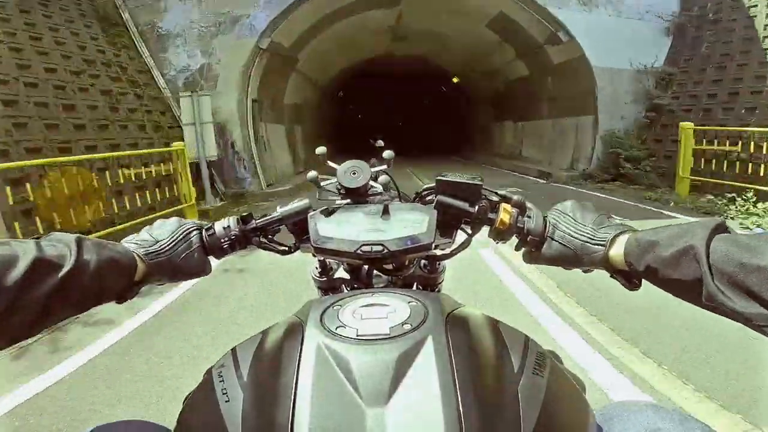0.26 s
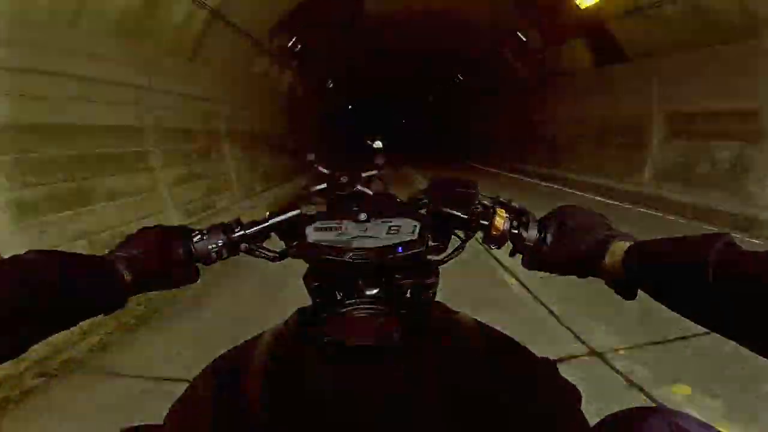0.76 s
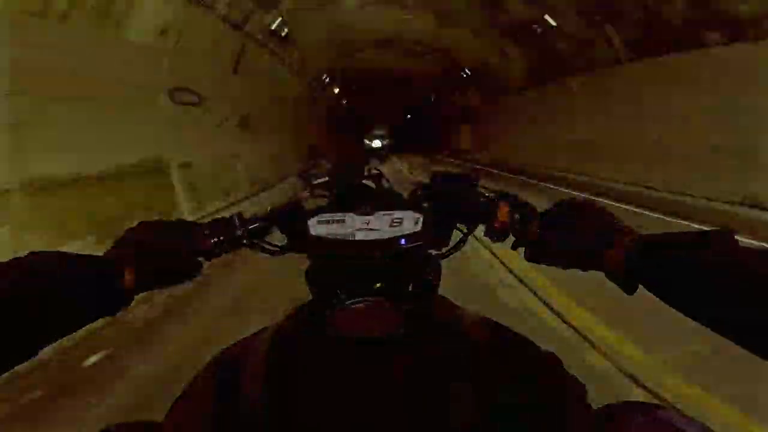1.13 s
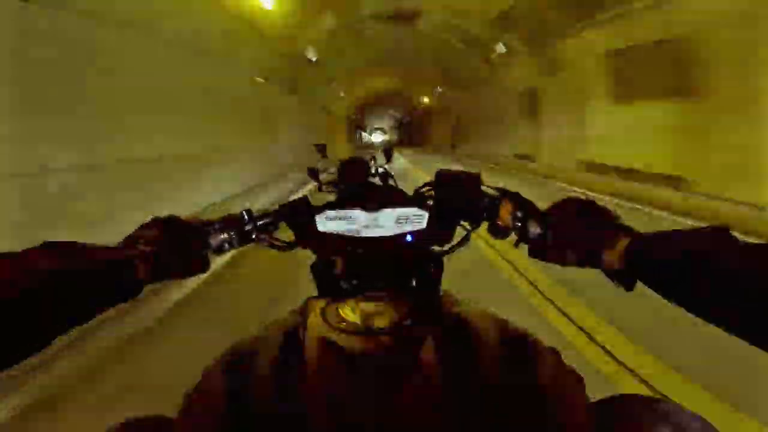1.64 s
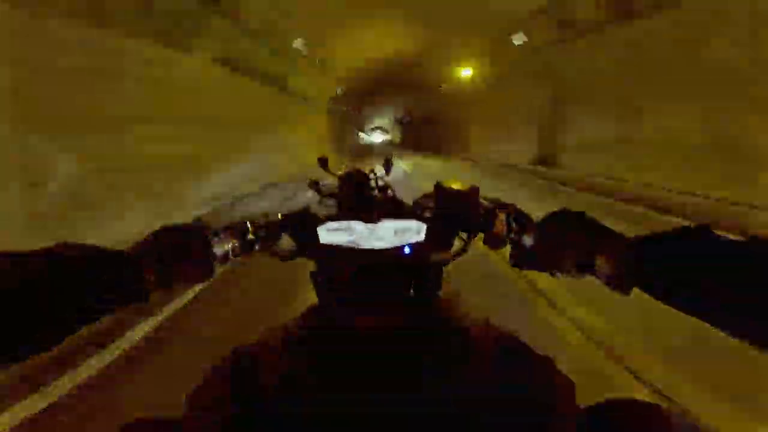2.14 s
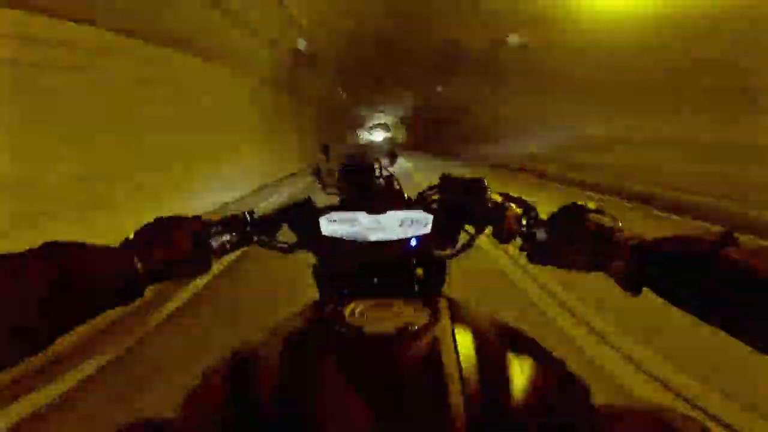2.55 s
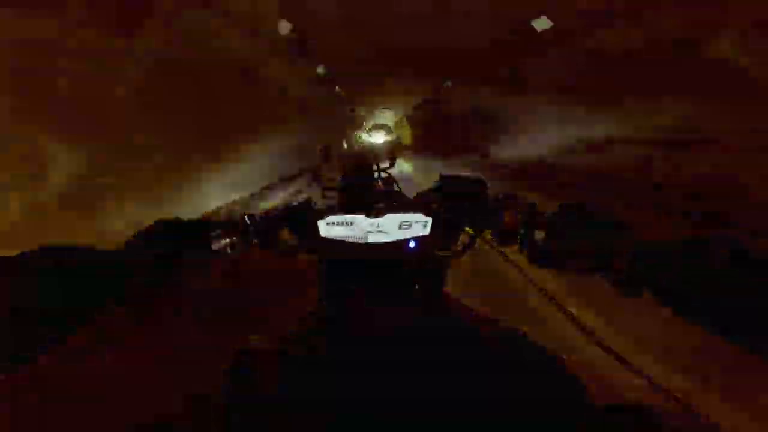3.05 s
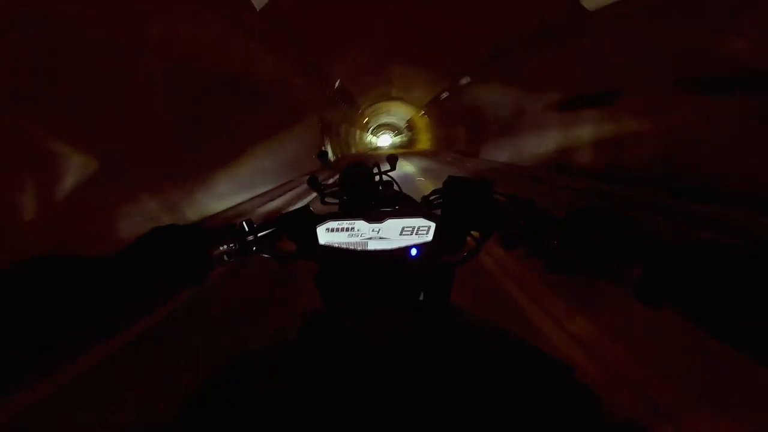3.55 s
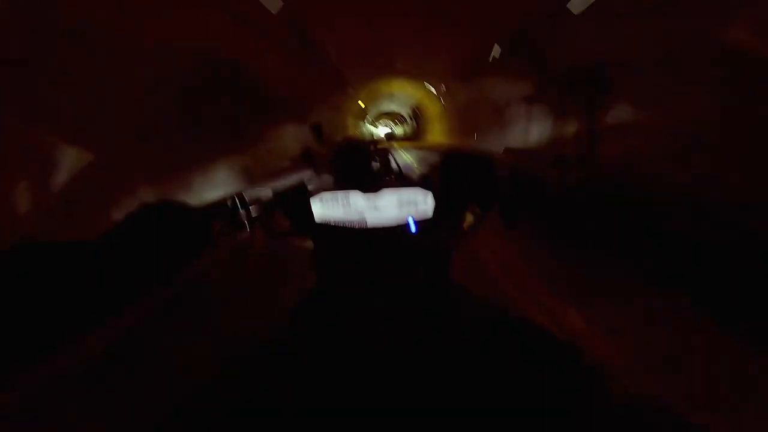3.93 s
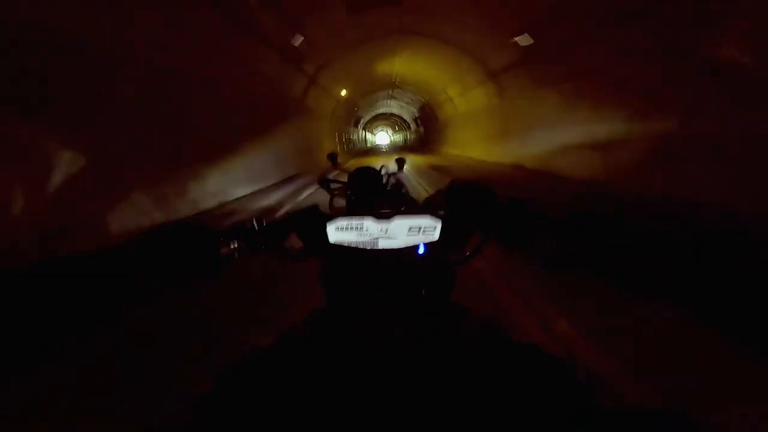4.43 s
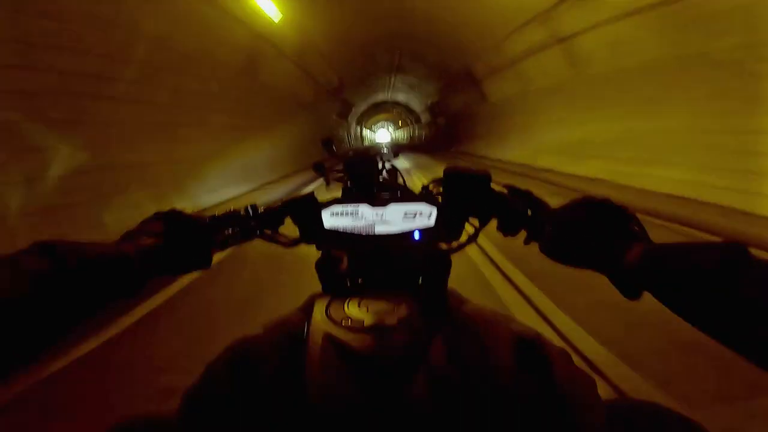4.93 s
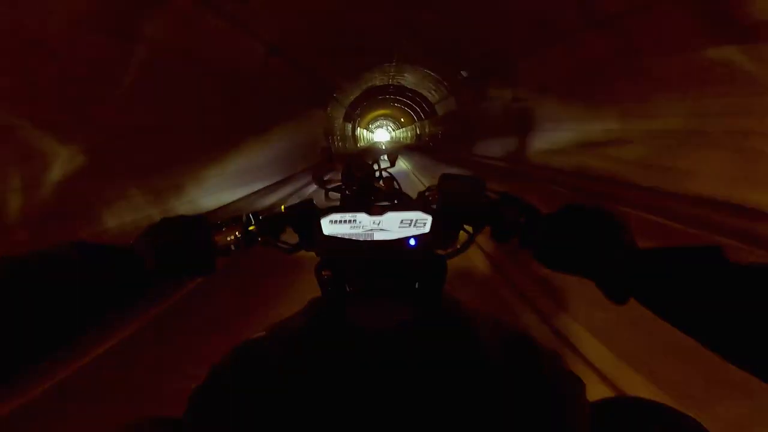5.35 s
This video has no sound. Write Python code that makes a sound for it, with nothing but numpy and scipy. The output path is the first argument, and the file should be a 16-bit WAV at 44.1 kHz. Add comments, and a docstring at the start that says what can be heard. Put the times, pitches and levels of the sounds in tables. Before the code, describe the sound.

A twin-cylinder motorcycle drones very close, heard from the rider's chest. It starts steady on a light throttle as it enters a concrete tunnel, then climbs smoothly in pitch without a gear change. The throttle opens in the second half, making it louder, rougher and raspier. Faint valve ticking and chain whirr sit on top, while smeared wall roar surrounds it and wind thumps the microphone.

```python
"""A twin-cylinder engine drones up close, rising as the motorcycle pulls faster into a road tunnel.
The microphone rides on the rider's chest. Two uneven firings a cycle sound through pipe and airbox as
a stack of gliding orders, and torn gas rasps harder as the throttle opens. Close by, valve gear whirrs
and ticks as gated noise, and the chain whines as wavering tones. Around them the tunnel walls return
a swirling echo and a smeared roar, and wind rumbles and buffets right on the microphone."""
import sys
import numpy as np
from scipy import signal
from scipy.fft import rfft, irfft, next_fast_len
from scipy.io import wavfile
from scipy.ndimage import map_coordinates

SR = 44100
rng = np.random.default_rng(int(sys.argv[2]) if len(sys.argv) > 2 else 0)


def digitize_waveform(pressure):
    """Quantize a signal to 16-bit integers and store it at the path in sys.argv[1].

    Rows of a 2-D input are taken as channels; values are limited to [-1, 1].
    """
    field = np.atleast_2d(pressure).T
    bounded = np.clip(field, -1, 1)
    quanta = np.round(bounded * 32767).astype(np.int16)
    wavfile.write(sys.argv[1], SR, quanta)


N = 246519

# Engine speed; a cycle is two crank turns and two firings. Each row: time in s, cycles a second.
SPEED = [(0.0, 36), (0.25, 36.22), (0.55, 36.33), (0.75, 36.42), (0.95, 36.77), (1.15, 37.08),
         (1.45, 37.44), (1.7, 37.95), (1.95, 38.42), (2.35, 38.9), (2.8, 39.57), (3.2, 40.19),
         (3.45, 40.65), (3.7, 41.0), (3.95, 41.72), (4.2, 42.25), (4.5, 42.7), (4.75, 43.06), (4.95, 43.68),
         (5.15, 44.52), (5.35, 44.94), (5.59, 45.75)]
# Throttle opening. Each row: time in s, opening from 0 (light cruise) to 1 (wide open).
THROTTLE = [(0, 0.0082), (.6, 0.056), (1.4, 0.22), (2.4, 0.2), (3.1, 0.27), (3.9, 0.62), (4.6, 0.66),
            (5.1, 0.97), (5.59, 1)]
# Resonances of pipe and airbox. Each row: centre in Hz, width in Hz, level in dB at a light cruise,
# gain in dB added at full throttle.
PIPE_MODES = [(75.6, 27, -35.5, 1.5), (90.4, 12.3, -35, 7.5), (113.2, 6.9, -47, 10.5),
              (142.9, 18.3, -25, -3), (164, 22, -37, 21.5), (197.6, 17, -42.5, 10.5),
              (229.7, 29.7, -36.5, -1.5), (271.3, 24, -46.5, 10), (313.8, 32.4, -48, 16.5),
              (380.8, 62, -43.5, 18), (419.5, 36.5, -31, -0.5), (444, 24.3, -36, 6),
              (469.8, 20.8, -43.5, 23), (467, 8.3, -37, -13.5), (509, 9.6, -45, -16), (533, 70, -54.5, 15),
              (630.4, 42, -48.5, 8.5), (663, 34, -40.5, -0.5), (775, 68, -58.5, 9), (838, 115, -49.5, 13.5),
              (902, 45, -54.5, 15), (1029, 100, -52.5, 13), (1116, 200, -63, 20)]
# Passing walls reinforce or cancel the airbox boom. Each row: time in s, half length in s, change in dB.
SWELLS = [(.1, 0.12, -2.5), (0.593, 0.17, 2), (0.824, 0.012, -4.5), (1.445, .07, 5.5), (1.86, 0.059, -0.5),
          (2.204, 0.067, -1.5), (2.542, 0.14, 4.5), (3.1, .3, 3.5), (3.753, 0.29, 7), (4.27, 0.031, -6),
          (5.072, 0.053, -9), (5.4, .2, 4.5)]
# Colour of the rasp at a light cruise. Each row: frequency in Hz, relative level in dB per Hz.
RASP_CRUISE = [(350, -20), (620, -2), (750, -6.5), (850, -9.5), (950, 0.5), (1080, -0.5), (1280, -7.5),
               (1530, -8.5), (1730, -12.5), (1860, -11.5), (2100, -16), (2700, -21.5), (4000, -38),
               (16000, -89.5)]
# Colour of the rasp with the throttle wide open. Each row: frequency in Hz, relative level in dB per Hz.
RASP_OPEN = [(350, -18), (620, 1.5), (740, -4.5), (850, 0.5), (1100, 4.5), (1300, -2.5), (1600, -7.5),
             (1860, -4.5), (2100, -12), (2700, -17), (4000, -33.5), (16000, -78)]
# The chain's whine. Each row: multiple of the tooth rate, level in dB with the chain taut.
WHINE = [(3, -60), (4, -67)]
# Colour of the machinery's hiss. Each row: frequency in Hz, relative level in dB per Hz.
WHIRR = [(1500, -16), (2350, -6), (3100, -2), (3700, -2.5), (4300, -8.5), (5300, -9.5), (6100, -12.5),
         (6700, -18.5), (7400, -15), (8700, -19), (10800, -20), (11400, -22), (13100, -26), (14100, -22.5),
         (15600, -43)]
# Ringing engine metal. Each row: frequency in Hz, width in Hz, relative level in dB.
METAL = [(3843, 110, 5), (4870, 330, 0.5), (8130, 180, -9), (8240, 220, -7.5), (9100, 170, -6.5),
         (9790, 270, -4), (10500, 310, -9)]
# Ring of the tunnel. Each row: frequency in Hz, time to die by 60 dB in s.
TUNNEL_T60 = [(100, 3.2), (500, 1.3), (2000, 1.5), (10000, 0.42)]
# Colour of the tunnel roar. Each row: frequency in Hz, relative level in dB per Hz.
ROAR = [(70, -13.5), (120, -5), (190, -1), (250, -0.5), (320, -4.5), (380, -3), (430, 1), (480, -2.5),
        (540, -3), (650, -1.5), (750, -8), (900, -10), (1500, -15.5), (5000, -100)]
# Colour of the wind. Each row: frequency in Hz, relative level in dB per Hz.
WIND = [(15, -15), (28, -3.5), (45, 0.5), (70, -2), (110, -11), (250, -7.5), (800, -60.5), (3000, -110)]
# Buffets of wind on the microphone. Each row: start in s, peak in dB before GUST_DB is added.
GUSTS = [(.72, -43), (1.39, -44.5), (2.52, -36), (2.59, -36.5), (3.174, -46), (3.454, -29.5), (3.79, -38),
         (3.91, -40.5), (4.5, -38), (5.11, -41.5), (5.42, -34)]
# Likeness of the two microphone ports. Each row: frequency in Hz, left-right likeness.
ALIKE = [(40, 0.19), (300, 0.84), (600, 0.57), (1200, 0.59), (2200, 0.3), (4000, 0.65), (8000, 0.95),
         (13000, 0.58)]
# Colour difference of the two ports. Each row: frequency in Hz, left minus right in dB.
LEAN = [(80, -2.5), (130, 1), (400, -0.9), (650, -3.5), (1200, -1.1), (2300, -0.5), (4400, 0), (9000, -0.3)]

# shares of a cycle: start to first firing, first firing to second, intake rush ahead of exhaust puff
FIRST_FIRING, SECOND_FIRING, INTAKE_LEAD = .256, 3 / 8, .2
FIRING_ORDER, BOOM_ORDER = 2, 11  # multiples of the cycle rate
MOUTH_HZ = 55  # the pipe's mouth radiates little below this
# a dull intake gulp: pitch and width in Hz, strength in dB beside an exhaust pulse
GULP_HZ, GULP_WIDTH_HZ, GULP_DB = 150, 180, 4
# the first gulp's lead on the first firing (share of a cycle), and the second gulp's relative strength
GULP_LEAD, SECOND_GULP = .332, .2
# above the boom the pipe drags each pulse into a short upward chirp: delay per order (share of a cycle)
DISPERSION = .0105
# levels in dB at a light cruise, and dB gained at full throttle
RASP_DB, RASP_PULL_DB = -43, 10.5
MACHINE_DB, MACHINE_PULL_DB = -59, 8
CHAIN_ORDER = 12.8  # sprocket teeth passing per engine cycle
SLACK_DB, SLACK_THROTTLE = 9.5, 0.41  # a slack chain whines louder, until about this throttle pulls it taut
SMEAR_RATE = 45.24  # pace of the Doppler smear on the wall echoes (knots a second)
WALL_HISS_DB = 2  # rise of the whirr per unit of tunnel enclosure
# breeze level at the starting speed, and its rise in dB for each added engine cycle a second
BREEZE_DB, BREEZE_RISE_DB = -46, 0.82
GUST_RISE_S, GUST_DB = 0.017, 3
TOP_HZ = 15720  # band limit


def amp(db):
    """Decibels to gain."""
    return 10 ** (np.asarray(db) / 20)


def unit(x):
    """Scale to rms 1."""
    return x / np.sqrt(np.mean(np.abs(x) ** 2) + 1e-20)


def along(points, hz):
    """Read (Hz, value) points on a log frequency axis."""
    f, v = np.transpose(points)
    return np.interp(np.log(hz + 1), np.log(f + 1), v)


def curve(rows):
    """Join (s, value) rows into one value per sample."""
    s, values = np.transpose(rows)
    return np.interp(np.arange(N) / SR, s, values)


def wobble(rate):
    """A smooth random curve, rate knots a second."""
    steps = np.linspace(0, N, 2048)
    coarse = map_coordinates(rng.standard_normal(1024), [steps * rate / SR], mode="wrap")
    return np.interp(np.arange(N), steps, coarse)


def filtered(x, response):
    """Multiply the spectrum of x by a response of frequency."""
    m = next_fast_len(N + SR // 2)
    return irfft(rfft(x, m) * response(np.fft.rfftfreq(m, 1 / SR)), m)[..., :N]


def coloured(x, spectrum):
    """Shape x by (Hz, dB) points and scale to rms 1."""
    return unit(filtered(x, lambda hz: amp(along(spectrum, hz))))


def resonance(hz, centre, width):
    """Complex response of one damped mode."""
    return 1j * hz * width / (centre ** 2 - hz ** 2 + 1j * hz * width)


def spread(pair):
    """Mix two unrelated signals as two close microphone ports hear them."""
    def weights(hz):
        turn = np.arccos(np.clip(along(ALIKE, hz), -1, 1)) / 2
        return np.array([np.cos(turn), np.sin(turn)])
    mid, side = filtered(pair, weights)
    return np.array([mid + side, mid - side])


def noise():
    """Stereo white noise, as alike at the two ports as ALIKE says."""
    return spread(rng.standard_normal((2, N)))


def exhaust(cycle, speed, throttle, second=0.86, second_fade=0.47, blur_order=27, scatter=0.73,
            jitter=0.0009, swirl=0.099, swirl_top=0.18, count=30):
    """Two uneven firings a cycle make orders that climb through the pipe's modes; wall echoes swirl each."""
    note = np.zeros((2, N))
    t = np.arange(N) / SR
    slow = slice(None, None, 256)
    swell = amp(sum(db * np.exp(-((t - s) / length) ** 2) for s, length, db in SWELLS))
    # the wider the throttle, the more the echoes swirl
    unrest = swirl_top * (0.5 + 0.6 * throttle)
    # under load each firing comes a little early or late
    cycle = cycle + jitter * throttle * wobble(85)
    for k in range(1, count + 1):
        # the second firing adds to some orders and cancels others, less so under load and in top orders
        late = np.exp(-2j * np.pi * k * SECOND_FIRING)
        second_level = (second - second_fade * throttle[slow]) * np.exp(-(k / blur_order) ** 8)
        pair = abs(1 + second_level * late)
        gain = np.interp(t, t[slow], pair * pipe(k * speed[slow], throttle[slow]))
        if k == BOOM_ORDER:
            gain = gain * swell
        # pulses and the gulps ahead of them set each order's phase; reflections scatter the top ones
        gulp = amp(GULP_DB) * resonance(k * speed.mean(), GULP_HZ, GULP_WIDTH_HZ)
        gulps = gulp * (1 + SECOND_GULP * late) * np.exp(2j * np.pi * k * GULP_LEAD)
        lag = np.angle(1 + late - gulps) + scatter * (k / count) ** 2 * rng.standard_normal()
        chirp = np.pi * DISPERSION * max(k - BOOM_ORDER, 0) ** 2
        angle = 2 * np.pi * k * cycle + lag - chirp
        direct, shifted = np.cos(angle), np.sin(angle)
        echo = lambda rate: wobble(rate) * direct + wobble(rate) * shifted
        # the higher the order, the less of it stays a clean line
        depth = swirl + unrest * (k / count) ** 2
        if k in (FIRING_ORDER, BOOM_ORDER):
            depth = depth * .55
        mid = direct + depth * echo(8 + 1.1 * k)
        side = 0.77 * depth * echo(2.88)
        note += gain * np.sqrt(2) * np.array([mid + side, mid - side])
    return note


def pipe(hz, throttle):
    """Gain of pipe and airbox; opening the throttle raises or lowers each resonance by its own amount."""
    power = 0
    for centre, width, db, pull_db in PIPE_MODES:
        mode = amp(db + pull_db * throttle) / (1 + (2 * (hz - centre) / width) ** 2)
        power = power + mode ** 2
    return np.sqrt(power / (1 + (MOUTH_HZ / hz) ** 10))


def puffs(cycle, sharpness, second=1):
    """A gate that opens at each firing, a little differently every time."""
    bump = lambda at: np.exp(sharpness * (np.cos(2 * np.pi * (cycle - at)) - 1))
    return unit((bump(0) + second * bump(SECOND_FIRING)) * amp(0.67 * wobble(80)))


def rasp(cycle, throttle, buzz_db=-6.5, intake=0.96):
    """Gas tears through intake and pipe in four puffs a cycle; part repeats as a buzz, and load recolours it."""
    # one random shape, repeated every cycle
    shape = rng.standard_normal(512)
    buzz = map_coordinates(shape, [cycle % 1 * len(shape)], mode="wrap")
    buzz = filtered(buzz, lambda hz: 1 - 1 / (1 + (hz / 1200) ** 8))
    share = np.clip(0.48 + 0.24 * throttle ** 2, 0, 1)  # of the gas that comes in puffs
    exhaust_puffs = puffs(cycle, sharpness=7.8)
    intake_puffs = puffs(cycle + INTAKE_LEAD, sharpness=8.1)
    gate = 1 - share + share * unit(exhaust_puffs + intake * intake_puffs)
    gas = gate * (noise() + buzz * amp(buzz_db + 1.5 * wobble(8)))
    load = np.clip(throttle, 0, 1) ** 2
    return (1 - load) * coloured(gas, RASP_CRUISE) + load * coloured(gas, RASP_OPEN)


def chain(cycle, throttle):
    """Links meshing with the sprocket whine unsteadily, most while the chain is slack."""
    slack_db = SLACK_DB * np.exp(-abs(throttle) / SLACK_THROTTLE)
    whine = 0
    for multiple, db in WHINE:
        angle = 2 * np.pi * round(multiple) * CHAIN_ORDER * cycle + 2.3 * wobble(42)
        whine = whine + amp(db + slack_db + 2.5 * wobble(12)) * unit(np.sin(angle))
    return whine


def machinery(cycle, metal_db=-7, clatter=0.073, flutter_db=0.85, wheel_ratio=0.28):
    """Valve gear and chain: a fluttering hiss, and ticks that ring the engine's metal."""
    clattering = noise() * (1 + clatter * puffs(cycle, sharpness=3.5))
    hiss = coloured(clattering * amp(1.1 * wobble(150)), WHIRR)
    ticks = noise() * (3.1 + puffs(cycle, sharpness=5.5)) * amp(wobble(25))
    ring = filtered(ticks, lambda hz: sum(amp(db) * resonance(hz, c, w) ** 2 for c, w, db in METAL))
    # the chain tightens and slackens once per turn of the rear wheel
    wheel = np.sin(2 * np.pi * wheel_ratio * cycle + wobble(1.9))
    flutter = flutter_db * wheel + 0.21 * wobble(21)
    return unit(hiss + amp(metal_db) * unit(ring)) * amp(flutter)


def valves(cycle, tick_db=-61):
    """Valves snap shut in short, uneven ticks of noise."""
    snaps = puffs(cycle + INTAKE_LEAD, sharpness=160) * amp(6 * np.tanh(wobble(70)))
    colour = [(700, -21.0), (1600, 8), (2600, 1.0), (5000, -11.5), (12000, -27.5)]
    return amp(tick_db) * coloured(snaps * noise(), colour)


def tunnel(x):
    """The concrete tube rings on as decaying noise, longest in the bass."""
    hz, t, z = signal.stft(rng.standard_normal((2, SR)), SR, nperseg=256)
    decay = amp(-60 * t / along(TUNNEL_T60, hz)[:, None])
    tail = signal.istft(z * decay, SR, nperseg=256)[1]
    tail = tail / np.linalg.norm(tail[0])
    return spread(signal.fftconvolve(x.mean(axis=0)[None], tail, axes=1)[:, :N])


def wall_echo(engine):
    """The walls return little of the deep firing note, and the motion smears its pitch."""
    returned_db = [(90, -36.0), (200, -21.5), (450, -17.5), (1000, -13.0)]
    returned = filtered(engine, lambda hz: amp(along(returned_db, hz)))
    return tunnel(returned) * wobble(SMEAR_RATE)


def tunnel_roar(throttle):
    """Tyre and engine noise, smeared by the walls into a roar that swells with the throttle."""
    return amp(-34.0 + 4.6 * throttle + 0.39 * wobble(16.0)) * coloured(noise(), ROAR)


def wind(speed, unrest_db=1.5):
    """An uneven rumble that grows with speed, and buffets that rise fast and die away."""
    t = np.arange(N) / SR
    breeze = amp(BREEZE_DB + BREEZE_RISE_DB * (speed - speed[0]) + unrest_db * wobble(25))
    buffet = lambda age: age * np.exp(1 - age)
    gusts = sum(amp(db + GUST_DB) * buffet(np.maximum(t - s, 0) / GUST_RISE_S) for s, db in GUSTS)
    # both ports feel nearly the same pressure
    air = rng.standard_normal(N) + .25 * rng.standard_normal((2, N))
    return np.hypot(breeze, gusts) * coloured(air, WIND)


def scene():
    """The engine close to the chest, the tunnel closing in around it, and wind at the microphone."""
    speed, throttle = curve(SPEED), curve(THROTTLE)
    cycle = np.cumsum(speed) / SR - FIRST_FIRING
    engine = exhaust(cycle, speed, throttle) + chain(cycle, throttle)
    engine = engine + amp(RASP_DB + RASP_PULL_DB * throttle) * rasp(cycle, throttle)
    whirr = amp(MACHINE_DB + MACHINE_PULL_DB * throttle) * machinery(cycle) + valves(cycle)
    # how far the tunnel encloses the rider, 1 at the end
    inside = curve([(0, 0.41), (.4, 0.59), (.9, 0.88), (1.4, 0.9), (5.59, 1)])
    walls = inside * (wall_echo(engine) + tunnel_roar(throttle))
    whirr = whirr * amp(WALL_HISS_DB * (inside - 0.73))
    return engine + walls + whirr + wind(speed)


def record(dry):
    """The two ports differ a little in colour; soft ends, and nothing above the band limit."""
    ends = signal.windows.tukey(N, .002)
    ports = lambda hz: amp(np.outer([.5, -.5], along(LEAN, hz))) * (hz < TOP_HZ)
    return filtered(dry * ends, ports)


dry = scene()
out = record(dry)
digitize_waveform(out)
```